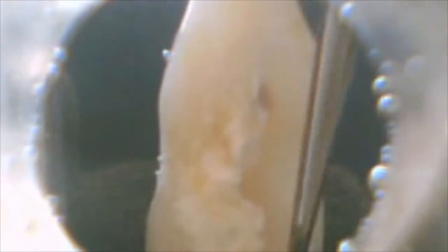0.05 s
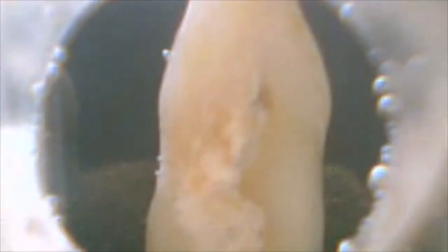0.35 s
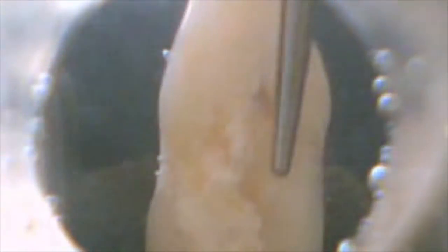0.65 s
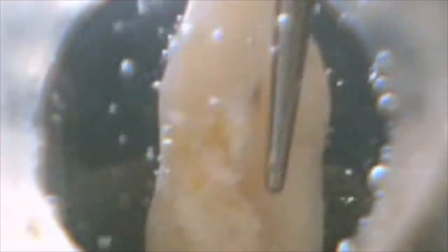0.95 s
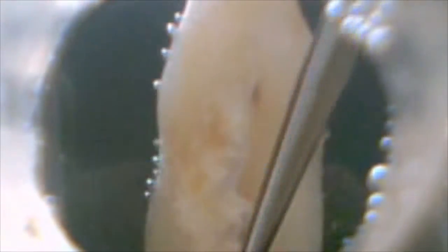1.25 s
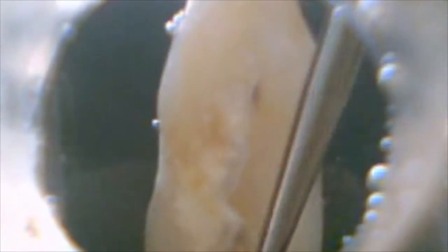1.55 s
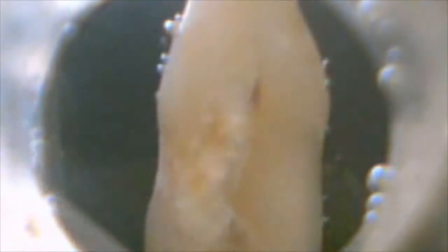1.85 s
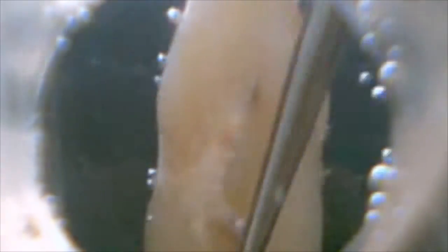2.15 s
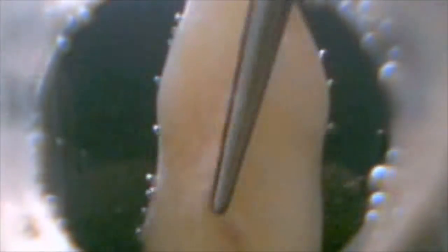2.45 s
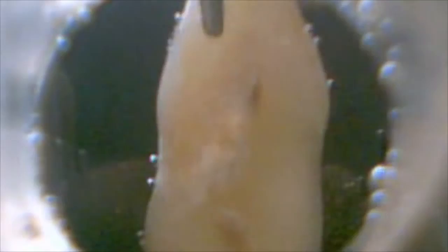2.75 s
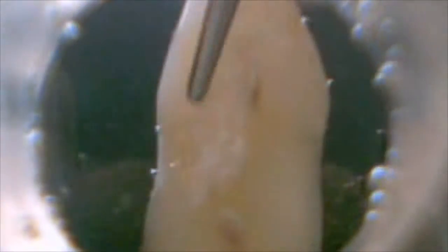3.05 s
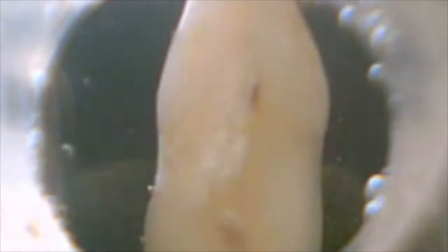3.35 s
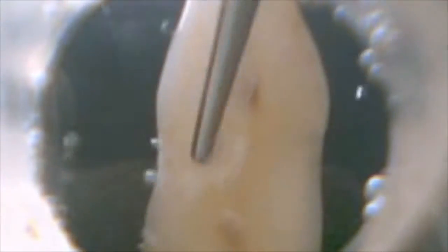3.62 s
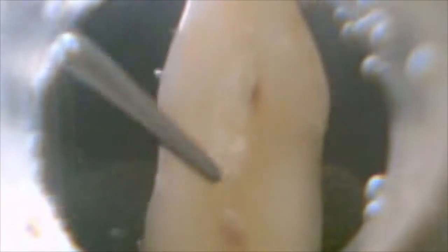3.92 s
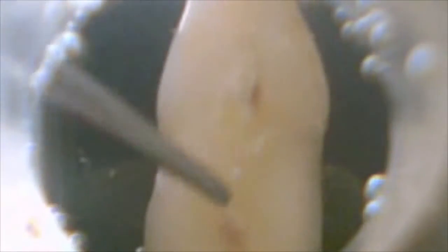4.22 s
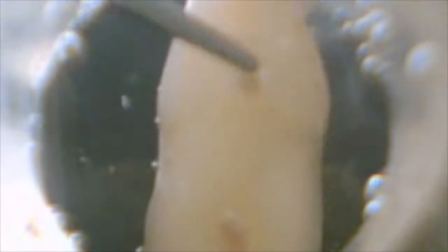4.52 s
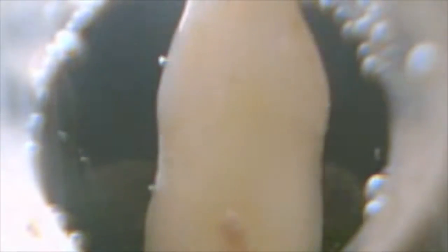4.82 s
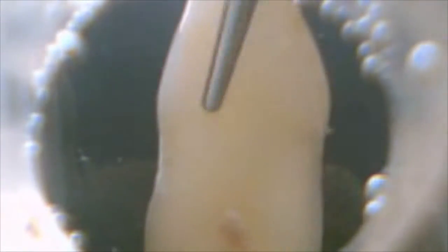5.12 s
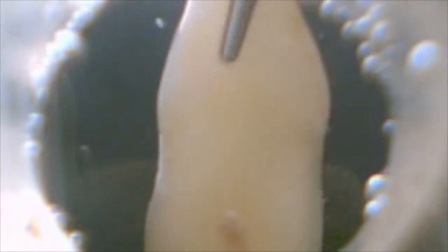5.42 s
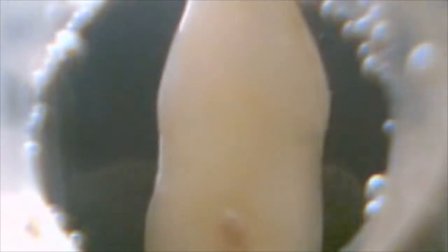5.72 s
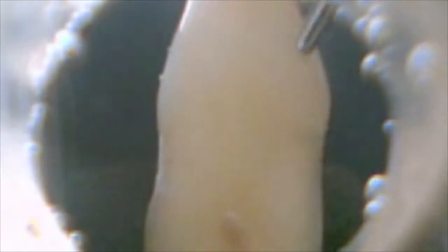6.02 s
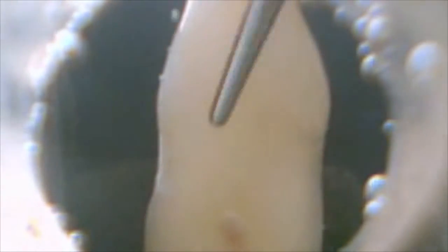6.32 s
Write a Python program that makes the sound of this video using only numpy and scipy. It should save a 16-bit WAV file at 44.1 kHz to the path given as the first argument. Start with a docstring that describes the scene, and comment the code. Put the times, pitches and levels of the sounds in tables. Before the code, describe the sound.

An ultrasonic dental scaler works on a wet tooth in short bursts, its high whistle gliding up and down over crackling water.

```python
"""Close on a wet tooth model, at the microphone of a small camera whose electronics hiss and whine.
An ultrasonic dental scaler cuts out; its idle tip taps and squeaks. Then it runs in short stretches:
each opens with ticks and a fast search sweep, then the camera's sampler folds the tip's ultrasound down
to a whistle that glides as the load detunes the tip, while the water crackles with collapsing bubbles.
After the last stretch, hiss and whine give way to a low hum."""
import sys
import numpy as np
from scipy import signal
from scipy.fft import rfft, irfft
from scipy.io import wavfile

SR = 44100
rng = np.random.default_rng(int(sys.argv[2]) if len(sys.argv) > 2 else 0)


def store_wav(level_fs):
    """Save 16-bit WAV to argv[1]."""
    pcm = np.round(np.clip(np.atleast_2d(level_fs), -1, 1) * 32767)
    wavfile.write(sys.argv[1], SR, pcm.T.astype(np.int16))


N = 290029
TIME = np.arange(N) / SR
SEARCH_S = 0.016  # from switch-on until the drive locks to the tip
TOP_HZ = 16000  # upper edge of the camera's sound


def scaler(first_db=-50, full_db=-42, swept_db=-47, build_s=0.0052, whistle_trim_db=-0.08):
    """The drive searches under a swell of fizz, then locks: the tip whistles and fizzes until cut off."""
    # stretches with the drive on; whistle and fizz before their trims: (on [s], off [s], whistle [dB],
    # sweep's delay to 0 Hz [s], sweep there [dB], first fizz [dB], last fizz [dB], sizzle lift [dB])
    runs = [(-0.017, 0.039, -40, 0.0163, -35, -43, -49.5, 1.5),
            (0.748, 1.087, -40, 0.013, -35, -48.5, -63.5, 0.5),
            (1.1476, 1.304, -40, 0.013, -34, -60, -68, 4.5), (1.4234, 1.59, -40, 0.014, -35, -57.5, -59, 0),
            (1.706, 1.92, -40.5, 0.016, -35.5, -73, -53.5, 2),
            (2.058, 2.191, -41, 0.016, -34.5, -55, -56, 3),
            (2.255, 2.702, -41, 0.016, -35, -49.5, -56.5, 0.5),
            (2.915, 3.107, -41, 0.016, -34.5, -48, -60, -6),
            (3.264, 3.461, -41.5, 0.017, -33.5, -44, -63, -2),
            (3.673, 3.91, -41, 0.016, -36.5, -51, -58, -4.5),
            (4.056, 4.864, -39, 0.0163, -34.5, -54, -54, 2), (5.112, 5.748, -41.4, 0.017, -34, -51, -52, 1),
            (5.886, 5.965, -41.5, 0.017, -36, -49.5, -52, -1),
            (6.136, 6.251, -43, 0.016, -35.5, -43.5, -58.5, 0.5),
            (6.306, 6.445, -44, 0.018, -35, -45.5, -49.5, 1.5)]
    # the whistle's glide under changing load, one list a stretch: (time [s], pitch [Hz])
    glides = [
        [(0.001, 7500), (0.019, 7570), (0.037, 8860)],
        [(0.767, 4715), (0.859, 5934), (0.873, 7200), (0.919, 7460), (0.981, 4615), (1.009, 4070),
         (1.017, 4706), (1.085, 3884)],
        [(1.167, 3757), (1.205, 3890), (1.229, 4925), (1.275, 3620), (1.302, 3780)],
        [(1.443, 4635), (1.487, 3751), (1.497, 3948), (1.587, 2827)],
        [(1.725, 10030), (1.763, 11370), (1.819, 10400), (1.881, 12470), (1.917, 11820)],
        [(2.076, 9788), (2.168, 9240), (2.19, 9929)],
        [(2.275, 8776), (2.299, 8261), (2.357, 9680), (2.465, 7170), (2.517, 9834), (2.553, 10610),
         (2.601, 10500), (2.7, 8970)],
        [(2.934, 4150), (2.954, 4893), (3.018, 5149), (3.06, 6425), (3.104, 6339)],
        [(3.283, 10560), (3.305, 11952), (3.313, 11610), (3.459, 12700)],
        [(3.69, 10603), (3.71, 11606), (3.836, 10400), (3.908, 11500)],
        [(4.075, 9130), (4.105, 9680), (4.291, 6425), (4.309, 5525), (4.359, 5695), (4.427, 4806),
         (4.439, 5263), (4.627, 4238), (4.645, 4960), (4.665, 4352), (4.729, 4360), (4.741, 4925),
         (4.795, 4414), (4.862, 4324)],
        [(5.131, 9220), (5.199, 12020), (5.223, 11340), (5.245, 12560), (5.419, 12000), (5.455, 13220),
         (5.485, 11810), (5.727, 11880), (5.745, 12400)],
        [(5.904, 9100), (5.93, 10480), (5.964, 10600)],
        [(6.154, 9940), (6.236, 12240), (6.25, 12440)],
        [(6.325, 10500), (6.375, 12740), (6.445, 12330)],
    ]
    glide_hz, = curves([point for glide in glides for point in glide])
    surge, pull_hz = bubble_cloud()
    searches, drive, crackle, sizzle = np.zeros((4, N))
    for on, off, db, fold_s, sweep_db, start_db, end_db, lift_db in runs:
        locked = gate(on + SEARCH_S, off)
        drive += undb(db) * locked
        swell = np.interp(TIME - on, [0, build_s, SEARCH_S], undb([first_db, full_db, swept_db]))
        swell *= gate(on, on + SEARCH_S)
        fizz = locked * undb(np.interp(TIME, [on, off], [start_db, end_db]))
        crackle += swell + fizz
        sizzle += swell + undb(lift_db) * fizz
        if on > 0:
            searches += search(on, fold_s, sweep_db)
    tip = undb(whistle_trim_db) * whistle(glide_hz + pull_hz, surge, drive)
    return searches + tip + water(surge, crackle, sizzle)


def whistle(hz, surge, drive, waver_hz=85, flutter_hz=55, slip_rad=0.26, grit=0.2, sag=0.067):
    """The locked tip, folded down: its pitch trembles with the contact, and bubble clouds load it."""
    phase = turn(hz + waver_hz * wander(45.16) + flutter_hz * wander(571))
    # the sampler's timing slips once a millisecond, which puts sidebands 1 kHz apart
    phase += slip_rad * signal.sawtooth(2 * np.pi * 1000 * TIME)
    amplitude = 1 + grit * wander(1400) - sag * surge
    octave = undb(-27 + 6.4 * surge) * np.sin(2 * phase + wander(450)) * (2 * hz < TOP_HZ)
    return np.sqrt(2) * drive * (amplitude * np.sin(phase) + octave)


def search(on, fold_s, sweep_db, sweep_hz_per_s=3e6, droop_db=-3):
    """The drive ticks and sweeps to find the tip's resonance; folded down, the sweep is a steep chirp."""
    # ticks of the searching drive: (delay from switch-on [s], pitch [Hz], damping [Hz], peak [dB])
    ticks = [(.0003, 2860, 4350, -33.5), (.0043, 3050, 12000, -44.5), (.0093, 5000, 12000, -19)]
    hz = sweep_hz_per_s * (TIME - on - fold_s)
    heard = gate(on, on + SEARCH_S) * (np.abs(hz) < TOP_HZ)
    height = np.minimum(np.abs(hz) / TOP_HZ, 1)
    chirp = np.sin(turn(hz * heard) + 2 * np.pi * rng.random())
    out = np.sqrt(2) * heard * undb(sweep_db + droop_db * height) * chirp
    for delay, tick_hz, damping_hz, db in ticks:
        add_tick(out, on + delay, tick_hz, damping_hz, db)
    return out


def bubble_cloud(throb_hz=43.04, drift=0.198, throb_weight=0.26, churn_hz=148, flick_hz=239.5):
    """Clouds grow and collapse in an uneven throb: gives their surge (rms 1) and pull on the pitch (Hz)."""
    throb = np.sin(turn(throb_hz * (1 + drift * wander(9.43))))
    # each throb unloads the tip and flicks the pitch up, by a height that spreads 4 dB
    flicks = flick_hz * undb(4 * wander(20)) * np.maximum(throb, 0)
    surge = unit(throb_weight * np.sqrt(2) * throb + wander(churn_hz))
    return surge, flicks - flicks.mean()


def water(surge, crackle, sizzle, split_hz=3470, crackle_trim_db=1.75, sizzle_trim_db=1.5):
    """Cavitation as low crackle and high sizzle, each at its own strength and swollen by sputters."""
    # large clouds collapsing, before the trims: (time [s], length [s], crackle [dB], sizzle [dB])
    sputters = [(0.881, 0.022, -44, -42), (0.907, 0.03, -45, -44.5), (1.019, 0.0053, -36.5, -47),
                (1.075, 0.0047, -43, -66), (1.576, 0.026, -52.5, -68), (1.742, 0.042, -46, -49),
                (1.774, 0.01, -43, -51), (1.834, 0.016, -42, -47.5), (1.869, 0.016, -49.5, -44.5),
                (2.545, 0.07, -50.5, -51), (2.588, 0.014, -47, -46), (2.626, 0.009, -50, -42.5),
                (3.021, 0.012, -44, -47.5), (3.097, 0.008, -46.5, -52), (3.407, 0.044, -46, -46),
                (3.448, 0.03, -46.5, -48.5), (3.788, 0.013, -48, -50), (3.882, 0.016, -46.5, -62),
                (4.284, 0.0068, -41.5, -61), (4.308, 0.0077, -39, -58), (4.477, 0.0069, -42, -42.5),
                (4.52, 0.0067, -40, -47), (4.543, 0.007, -40, -60), (4.565, 0.006, -40.5, -60),
                (4.59, 0.0074, -44, -61), (5.178, 0.014, -41.5, -60), (5.519, 0.028, -46, -53),
                (5.715, 0.018, -46, -47), (5.951, 0.009, -40, -46)]
    for s, length, crackle_db, sizzle_db in sputters:
        swell = np.exp(-np.minimum((2 * (TIME - s) / length) ** 2, 20))
        crackle = np.hypot(crackle, undb(crackle_db) * swell)
        sizzle = np.hypot(sizzle, undb(sizzle_db) * swell)
    bubbles = cavitation(surge)
    low = signal.sosfiltfilt(signal.butter(2, split_hz, fs=SR, output="sos"), bubbles)
    return undb(crackle_trim_db) * crackle * low + undb(sizzle_trim_db) * sizzle * (bubbles - low)


def cavitation(surge, surge_db=3.5, grain_db=3.0):
    """Countless bubbles collapse at the tip, in clouds a few milliseconds long."""
    # colour of the collapses: (frequency [Hz], relative level [dB])
    spectrum = [(30, 4.5), (300, 0.5), (1500, 1), (4000, 2), (8000, 1), (12000, 4.5), (15500, 1)]
    collapses = rng.standard_normal(N) * undb(grain_db * rng.exponential(size=N).clip(0, 5))
    return unit(colour(collapses, spectrum) * undb(surge_db * surge))


def taps(damping_hz=3500, trim_db=-1):
    """Light taps of the idle tip and drops of water, each a short ring."""
    # taps and drops: (time [s], peak before the trim [dB], pitch [Hz])
    hits = [(0.116, -52, 2000), (0.546, -60, 2000), (0.6993, -61, 2000), (0.7154, -54, 2010),
            (1.3313, -61, 2000), (3.5996, -52, 2000), (4.9115, -42.5, 2038), (4.932, -50, 1997),
            (4.982, -55, 2010)]
    out = np.zeros(N)
    for s, db, hz in hits:
        add_tick(out, s, hz, damping_hz, db + trim_db)
    return out


def squeak(rasp_hz=160):
    """The idle tip sticks and slips over the wet tooth, in three rough harmonics."""
    # course of the squeak: (time [s], pitch [Hz], level of the fundamental [dB])
    course = [(.29, 3900, -85), (0.311, 4200, -66), (.325, 4660, -66), (.345, 4430, -76),
              (0.366, 4470, -62.5), (.376, 4770, -63), (.385, 4800, -96)]
    hz, db = curves(course)
    phase = turn(hz + rasp_hz * wander(480))
    harmonics = np.sin(phase) + undb(1) * np.sin(2 * phase) + np.sin(3 * phase)
    return undb(db) * harmonics * gate(course[0][0], course[-1][0])


def background(hiss_db=-67.5, air_db=-63, hum_from_s=6.482):
    """The noise floor: hiss and whine of the electronics, giving way to a duller hum."""
    # colours of the hiss and of the airy noise in the hum: (frequency [Hz], relative level [dB])
    hiss_spectrum = [(25, -9), (100, -6), (500, -0.5), (1000, -2), (2200, 0), (4000, -3), (8000, -4.5),
                     (13000, -4.5), (16000, -7)]
    air_spectrum = [(30, -16), (100, -8), (300, -7), (1000, -9.5), (3000, -17), (6500, -14), (7600, -15),
                    (8100, -62)]
    # steady tones of the whine and of the hum: (frequency [Hz], rms level [dB])
    whine_tones = [(1000, -85), (1999.5, -69), (2500, -79), (3000, -84.5), (5000, -85), (5994, -82.5),
                   (6993, -86), (9990, -85), (10988, -82), (11364, -88), (12986, -83), (13866, -79)]
    hum_tones = [(51, -65), (101, -67), (1384, -75.5), (2083, -74), (6277, -77)]
    hiss = undb(hiss_db) * colour(rng.standard_normal(N), hiss_spectrum) + tones(whine_tones)
    hum = undb(air_db) * colour(rng.standard_normal(N), air_spectrum) + tones(hum_tones)
    late = gate(hum_from_s, np.inf)
    return (1 - late) * hiss + late * hum


def add_tick(out, s, hz, damping_hz, db):
    """Add a click that rings one broad resonance and peaks at db."""
    t = np.arange(256) / SR
    ring = np.exp(-np.pi * damping_hz * t / 2) * np.sin(2 * np.pi * hz * t)
    start = int(np.clip(s * SR, 0, N - len(t)))
    out[start:start + len(t)] += undb(db) * ring / np.abs(ring).max()


def tones(table):
    """Steady sines of (frequency [Hz], rms level [dB])."""
    return sum(np.sqrt(2) * undb(db) * np.sin(2 * np.pi * (hz * TIME + rng.random())) for hz, db in table)


def colour(x, points):
    """Filter x by a curve of (frequency [Hz], relative level [dB]) and scale to rms 1."""
    hz, db = np.transpose(points)
    bins_hz = np.maximum(np.fft.rfftfreq(N, 1 / SR), 1)
    gain = undb(np.interp(np.log(bins_hz), np.log(hz), db))
    return unit(irfft(rfft(x) * gain, N))


def wander(rate_hz):
    """Smooth random motion of rms 1, mostly slower than rate_hz."""
    bins_hz = np.fft.rfftfreq(N, 1 / SR)
    return unit(irfft(rfft(rng.standard_normal(N)) / (1 + (bins_hz / rate_hz) ** 2), N))


def curves(table):
    """Each column of a timed table, joined by straight lines."""
    s, *columns = np.transpose(table)
    return [np.interp(TIME, s, column) for column in columns]


def gate(on, off):
    """1 between two times, with edges of half a millisecond."""
    return np.clip(np.minimum(TIME - on, off - TIME) * 2000 + .5, 0, 1)


def turn(hz):
    """Phase of a moving frequency."""
    return 2 * np.pi * np.cumsum(hz) / SR


def undb(db):
    """Decibels to gain."""
    return 10 ** (np.asarray(db) / 20)


def unit(x):
    """Scale to rms 1."""
    return x / np.sqrt(np.mean(x ** 2))


def scene():
    """The running and the idle tip over the noise floor, at one microphone."""
    return (scaler() + taps() + squeak() + background())[None]


def record(dry):
    """The camera rounds the highest peaks and cuts the top."""
    overload_db = -26
    rounded = dry / (1 + (dry / undb(overload_db)) ** 4) ** .25
    return signal.sosfiltfilt(signal.ellip(8, .1, 60, TOP_HZ, fs=SR, output="sos"), rounded)


dry = scene()
out = record(dry)
store_wav(out)
```